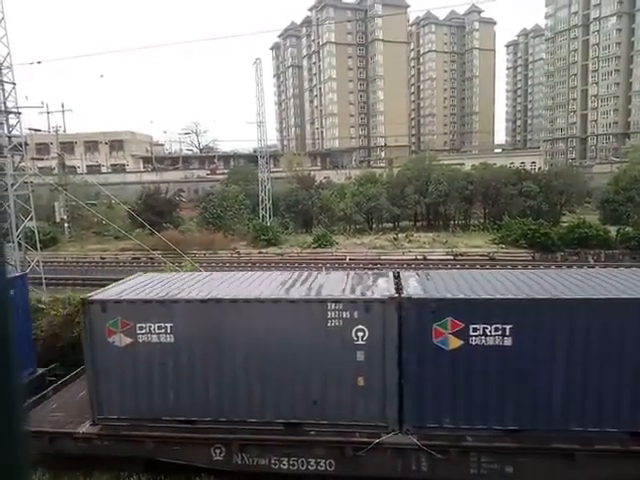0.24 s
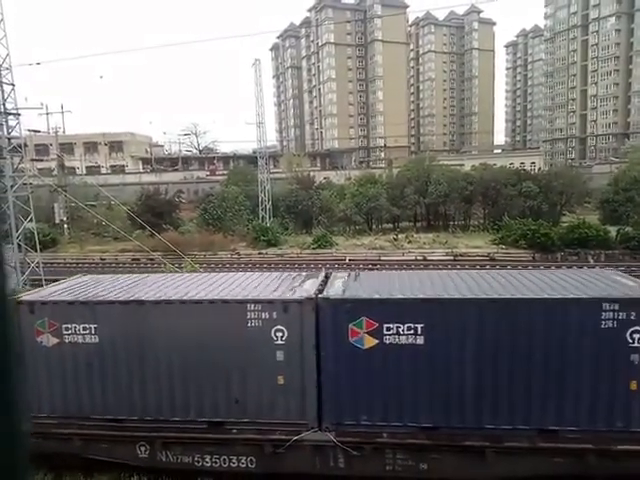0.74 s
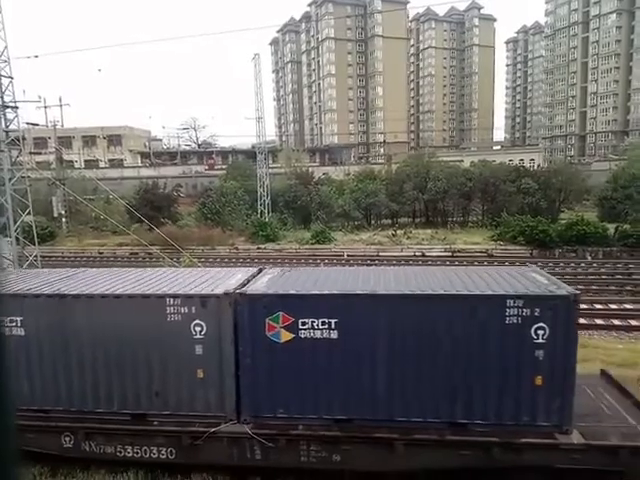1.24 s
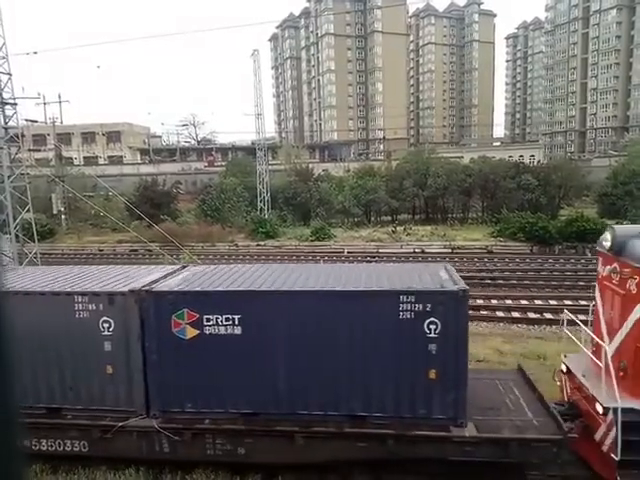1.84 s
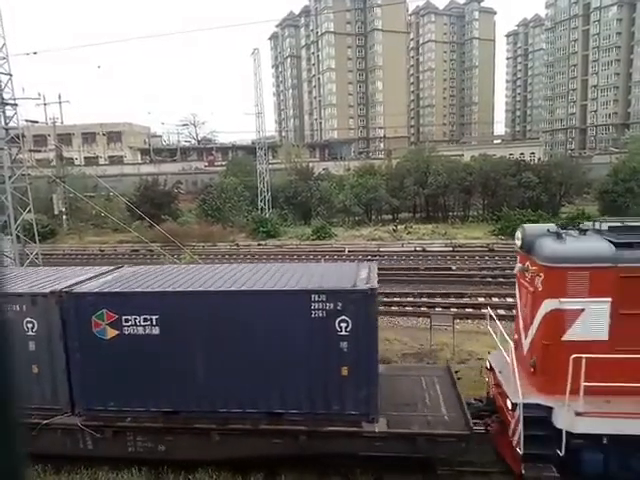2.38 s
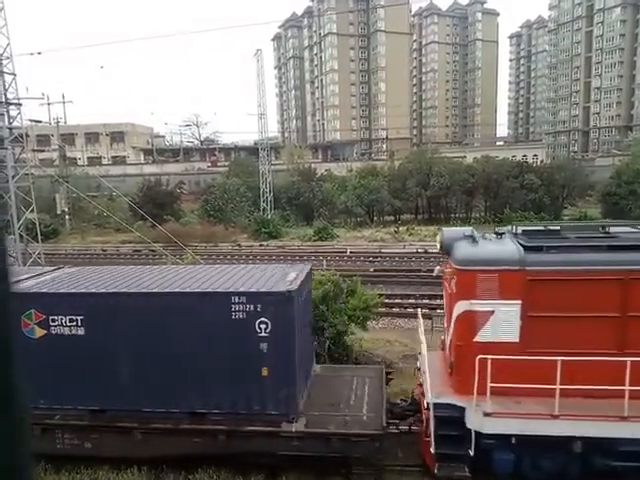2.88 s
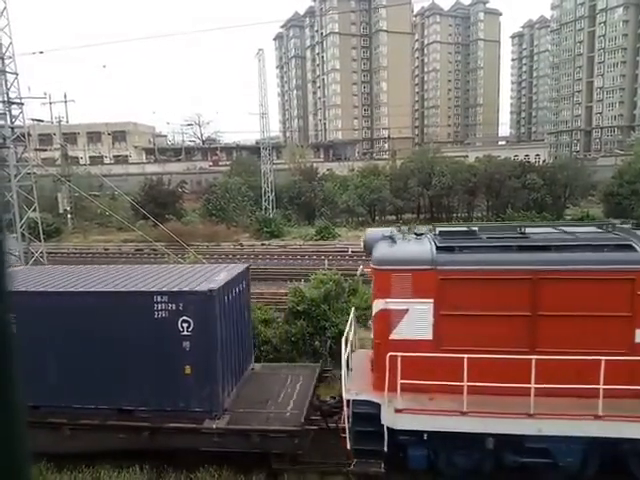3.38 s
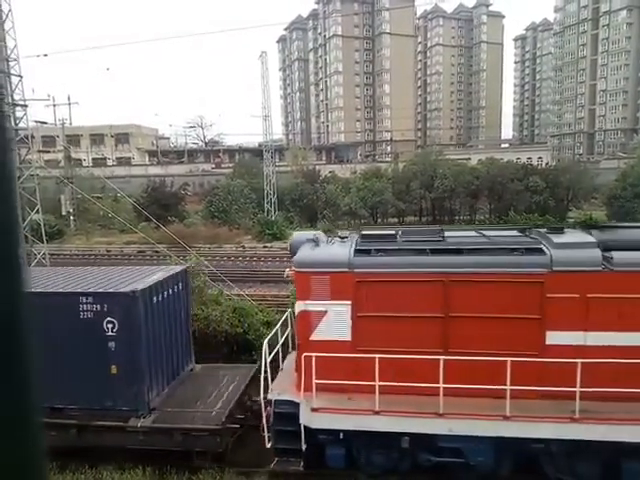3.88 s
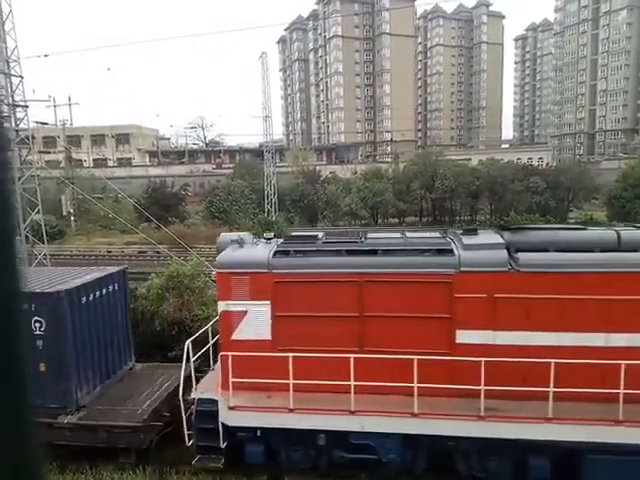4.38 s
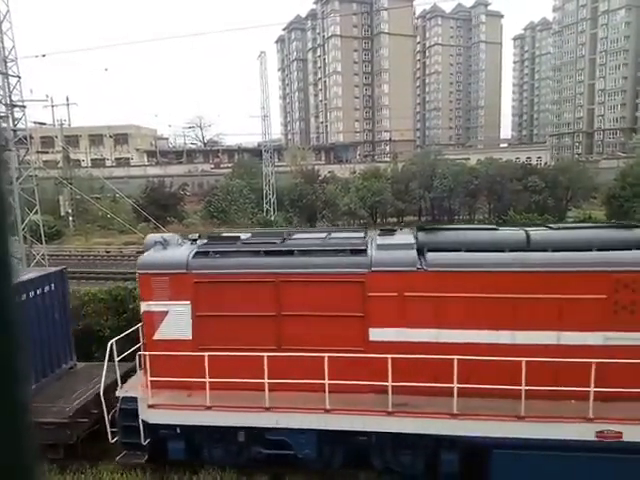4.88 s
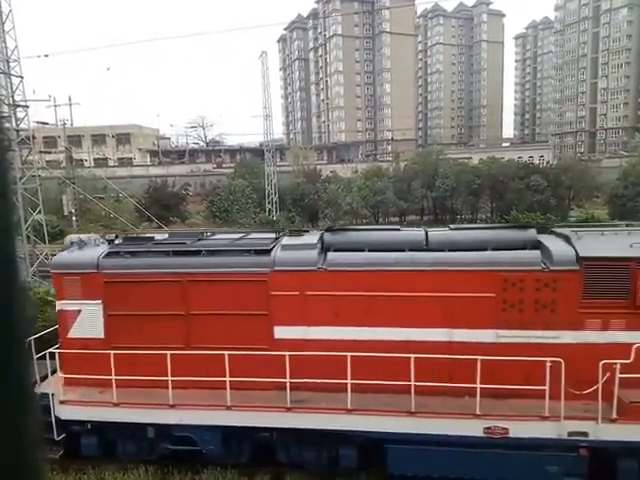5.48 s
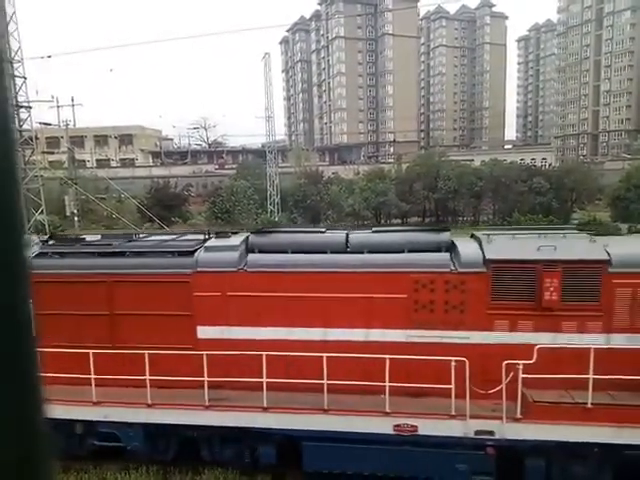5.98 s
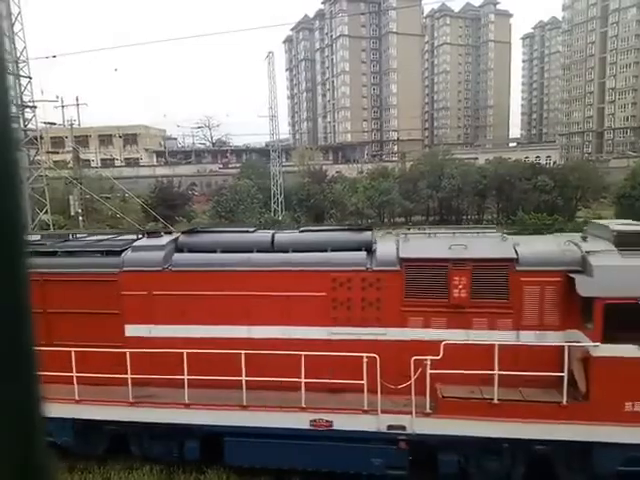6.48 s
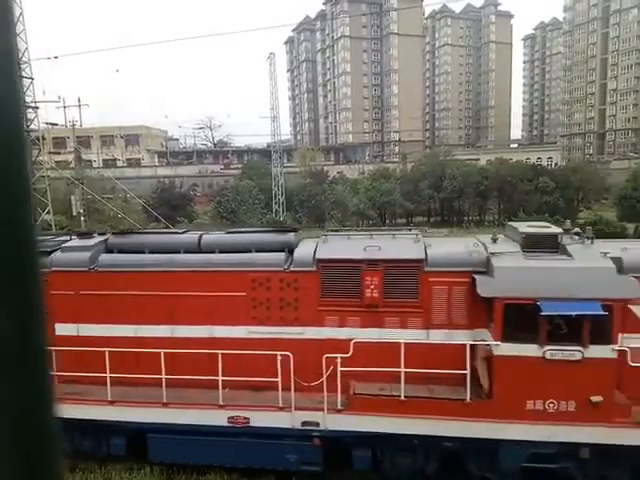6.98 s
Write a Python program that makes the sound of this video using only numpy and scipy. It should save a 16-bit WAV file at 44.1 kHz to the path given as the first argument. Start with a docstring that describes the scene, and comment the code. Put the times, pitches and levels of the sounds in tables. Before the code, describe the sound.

Container wagons roll slowly through a railway yard, their wheels rumbling with faint gritty chinks. A diesel locomotive approaches from the left, its exhaust droning in a loping rhythm over clattering machinery, a humming fan and a thin turbocharger squeal. Couplings scrape twice, a gear whine flares briefly, and the engine grows fuller as it draws level. The right microphone is muffled, so the treble stays left.

```python
"""A diesel locomotive idles slowly past in a railway yard, behind a string of container wagons.
It nears from the left over rumbling wheels: the exhaust drones on orders of the engine cycle,
the machinery throbs, the turbocharger squeals thinly. At 2.5 and 3 s couplings scrape.
Near 5 s a gear whine flares; near 6 s the engine draws level and its firing tone peaks.
The turbocharger's overtones grow toward the end. The right microphone is muffled: treble stays left."""
import sys
import numpy as np
from scipy import signal
from scipy.fft import rfft, irfft
from scipy.io import wavfile

SR = 44100
rng = np.random.default_rng(int(sys.argv[2]) if len(sys.argv) > 2 else 0)


def materialize(psi):
    """Save the field psi as 16-bit PCM at rate SR to the path in sys.argv[1].

    A 1-D psi becomes a single channel; in a 2-D psi each row is a channel.
    """
    bounded = np.clip(np.atleast_2d(psi).T, -1, 1)
    quanta = np.round(bounded * 32767).astype(np.int16)
    wavfile.write(sys.argv[1], SR, quanta)


N = 319284
TIME = np.arange(N) / SR
FREQ = np.fft.rfftfreq(N, 1 / SR)


def undb(db):
    """dB to gain."""
    return 10 ** (np.asarray(db) / 20)


def curve(table):
    """(t/s, value) points, linearly interpolated."""
    return np.interp(TIME, *np.transpose(table))


def unit(x):
    """Scale to rms 1."""
    return x / np.sqrt(np.mean(np.abs(x) ** 2))


def colour(x, spectrum):
    """Filter by (f/Hz, level/dB) points."""
    hz, db = np.transpose(spectrum)
    return irfft(rfft(x) * undb(np.interp(np.log(FREQ + 1), np.log(hz), db)), N)


def drift(rate_hz):
    """Smooth complex random motion, rms 1."""
    t = np.arange(0, 8, 1 / 500)
    f = np.fft.fftfreq(len(t), t[1])
    noise = rng.standard_normal((len(f), 2)) @ [1, 1j]
    return np.interp(TIME, t, unit(np.fft.ifft(noise / (1 + (f / rate_hz) ** 2))))


def diffuse(alike_hz=1300):
    """Noise at two close microphones: bass alike, treble unrelated."""
    mid, side = rfft(rng.standard_normal((2, N)))
    alike = 1 / (1 + (FREQ / alike_hz) ** 2) ** 2
    return irfft(mid * np.sqrt(1 + alike) + side * np.sqrt(1 - alike) * np.array([[1], [-1]]), N)


def tone(hz, scatter, rate_hz, doppler_hz=0):
    """Stereo tone, rms 1: direct path plus shifting reflections, offset by doppler_hz."""
    carrier = np.exp(2j * np.pi * np.cumsum(hz) / SR) * np.sqrt(2 / (1 + scatter ** 2))
    slip = np.exp(2j * np.pi * doppler_hz * TIME)
    return np.array([(carrier * (1 + scatter * slip * drift(rate_hz))).real for _ in range(2)])


def swell(at_s, db, width_s):
    """Bell-shaped gain."""
    return undb(db) * np.exp(-((TIME - at_s) / width_s) ** 2)


def throb(cycles, swing_db, peak_phase):
    """Gain that swells once a cycle."""
    return undb(swing_db * np.cos(2 * np.pi * (cycles - peak_phase)))


def offset(cycles, phase):
    """Signed distance from a phase, in cycles."""
    return (cycles - phase + .5) % 1 - .5


# Four-stroke cycle rate: t/s, f/Hz
CYCLE_HZ = [(0, 5.299), (3, 5.303), (7.24, 5.287)]


def engine_cycles():
    """Running count of engine cycles."""
    return np.cumsum(curve(CYCLE_HZ)) / SR


def repeating(cycles, change_hz):
    """Noise that recurs each engine cycle, its pattern slowly changing."""
    size = int(SR / CYCLE_HZ[0][1])
    patterns = rng.standard_normal((3, size, 2)) @ [1, 1j]
    index = (cycles % 1 * size).astype(int)
    return unit(sum((pattern[index] * drift(change_hz)).real for pattern in patterns))


# Pass-by per part ("fourth": turbo harmonic): closest t/s, half width/s, relative level/dB far, near
PASS_BY = { "firing": (6, 2.5, -32, -20), "gear": (5, 1.2, -41.5, -38), "machinery": (6, 2.3, -32.5, -30.5),
           "air": (9, 1.8, -44.5, -34), "intake": (6.5, 1.5, -35.5, -32.5),
           "fourth": (7.5, 2.34, -45.5, -32.5), }


def passing_db(part):
    """A part swells as it draws level."""
    closest_s, half_s, far_db, near_db = PASS_BY[part]
    return far_db + (near_db - far_db) / (1 + ((TIME - closest_s) / half_s) ** 2)


# Rolling noise: f/Hz, relative level/dB
RUMBLE_SPECTRUM = [(10, -13), (30, -10.5), (80, -5.5), (130, -4), (220, -2), (320, -4.5), (430, -9.5),
                   (580, -24.5), (1000, -34.5), (3000, -82.5)]


def wheels(db=-18.5, fade_db_per_s=0.1, waver_db=2.5):
    """Rough wheels and rails rumble through the frames of the departing wagons."""
    rumble = unit(colour(diffuse(), RUMBLE_SPECTRUM))
    return rumble * undb(db - fade_db_per_s * TIME + waver_db * drift(29).real)


def grit(db=-39, scatter_db=3, decay_s=0.043, low_hz=2000, high_hz=6600, count=110):
    """Grains crushed between wheel and rail chink at random times and pitches."""
    out, t = np.zeros((2, N + SR // 10)), TIME[:SR // 10]
    envelope = (1 - np.exp(-10 * t / decay_s)) * np.exp(-t / decay_s)
    for when, size, pitch, phase in rng.random((count, 4)):
        hz = low_hz + (high_hz - low_hz) * pitch
        chink = np.cos(2 * np.pi * (hz * t + np.array([[0], [phase]])))
        gain = undb(db - scatter_db * np.log(1 - .95 * size))
        out[:, int(when * N):][:, :len(t)] += chink * envelope * gain
    return out[:, :N]


# Coupling resonances: f/Hz, width/Hz, relative level/dB
STEEL_MODES = [(1200, 30, 1.5), (1730, 78, -11), (2000, 45, -3), (2560, 50, -1.5), (2820, 80, -3.5)]
# Sliding steel: f/Hz, relative level/dB
SCRAPE_SPECTRUM = [(600, -12), (1200, 1), (2400, 3.5), (3800, 12), (6500, -11), (7300, -30), (9500, -32)]
# Scrapes: t/s, ring level/dB, hiss level/dB, width/s
SCRAPE_EVENTS = [(2.55, -44, -35, 0.012), (2.977, -27, -32.5, 0.039)]


def couplings():
    """Slack shifts and steel slides on steel, hissing and ringing."""
    steel = sum(undb(db) / (1 + 1j * (FREQ - hz) / width_hz) ** 2 for hz, width_hz, db in STEEL_MODES)
    ring = unit(irfft(rfft(diffuse()) * steel, N))
    hiss = unit(colour(diffuse(), SCRAPE_SPECTRUM))
    return sum(ring * swell(at_s, ring_db, width_s) + hiss * swell(at_s, hiss_db, width_s)
               for at_s, ring_db, hiss_db, width_s in SCRAPE_EVENTS)


# Gear flare: t/s, level/dB, width/s
WHINE_FLARE = (5.15, -31, 0.06)


def gear(hz=1146):
    """A gear drive whines faintly and flares once."""
    whine = tone(np.full(N, hz), scatter=1.2, rate_hz=9)
    return whine * (undb(passing_db("gear")) + swell(*WHINE_FLARE))


# Blade tone: t/s, f/Hz
BLADE_HZ = [(0, 238.5), (1.7, 239.9), (4, 242.7), (6, 244), (7.24, 243.5)]
# Blade tone: t/s, level/dB
BLADE_DB = [(0, -39), (1, -24.5), (2.15, -20.5), (2.4, -30.5), (2.95, -18), (3.35, -29), (3.7, -19.5),
            (4.3, -27.5), (5.25, -32), (5.8, -21), (7.24, -34.5)]


def fan():
    """The cooling fan hums, swelling and fading unevenly."""
    return tone(curve(BLADE_HZ), scatter=.2, rate_hz=8.2)[0] * undb(curve(BLADE_DB))


# Blower hiss: f/Hz, relative level/dB
BLOWER_SPECTRUM = [(1500, -8.5), (2600, 1.5), (3050, 1.5), (3550, 1.5), (3800, 7), (4050, -1), (4300, 5.5),
                   (4650, -1.5), (4950, 1.5), (5600, -7.5), (5900, -6), (6150, 7.5), (6450, -10), (6750, 3),
                   (7250, -52.5), (9500, -58.5)]


def air(cycles, hiss_gain_db=11, duct_hz=2350, width_hz=330, sag_hz_per_s=36):
    """Air rushes through the blower and rings the intake duct, whose note sinks in passing."""
    hiss = unit(colour(diffuse(), BLOWER_SPECTRUM)) * undb(passing_db("air") + hiss_gain_db)
    lowpass = signal.butter(2, width_hz / 2, fs=SR, output="sos")
    band = signal.sosfilt(lowpass, rng.standard_normal((2, N)))
    carrier = np.cos(2 * np.pi * np.cumsum(duct_hz - sag_hz_per_s * TIME) / SR)
    duct = unit(band * carrier) * undb(passing_db("intake"))
    surge = throb(cycles, swing_db=1.3, peak_phase=.45) * undb(1.3 * drift(18).real)
    return (hiss + duct) * surge


# Clatter: f/Hz, relative level/dB
CLATTER_SPECTRUM = [(300, -13), (560, -4), (720, 2), (840, 1.5), (940, 4), (1060, -2.5), (1230, -5),
                    (1330, -2.5), (1450, -8), (1900, -7), (2700, -11.5), (4000, -70)]


def machinery(cycles, gain_db=4, repeat=0.38):
    """Valve gear and pumps clatter behind the hood doors, swelling each cycle and each crank turn."""
    clatter = unit(diffuse()) + repeat * repeating(cycles, change_hz=0.46)
    cycle_beat = throb(cycles, swing_db=0.5, peak_phase=0.61)
    crank_beat = throb(2 * cycles, swing_db=0.78, peak_phase=0.87)
    level_db = passing_db("machinery") + gain_db + 1.7 * drift(8.2).real
    return unit(colour(clatter, CLATTER_SPECTRUM)) * cycle_beat * crank_beat * undb(level_db)


def flutter(cycles, depth_db=-8, phase=0.49, width_turns=0.092):
    """Exhaust pulses dip the squeal unevenly once a crank turn, deepest while far off."""
    dip = np.exp(-(offset(2 * cycles, phase) / width_turns) ** 2)
    far = np.interp(TIME, [2.8, 3.7], [1, .6])
    return undb(depth_db * far * np.abs(drift(5)) * dip)


# Squeal (harmonic 2): t/s, f/Hz
SQUEAL_HZ = [(0, 3336), (2.5, 3361), (4, 3374), (5.4, 3372), (7.24, 3364)]
# Squeal: t/s, relative level/dB
SQUEAL_DB = [(0, -36), (.5, -35.5), (.9, -33), (3.1, -35), (3.9, -29.5), (4.32, -30.5), (4.38, -37),
             (5.2, -36.5), (5.38, -30), (5.7, -35.5), (6.4, -36), (6.55, -31), (6.95, -39.5), (7.12, -29)]
# Squeal dropouts: t/s, width/s
SQUEAL_FALTERS = [(0.725, 0.0089), (1.838, 0.017), (2.39, 0.014), (2.853, 0.022), (3.257, 0.024),
                  (4.576, 0.021), (5.128, 0.014), (5.723, 0.011), (6.098, 0.027), (6.443, 0.04)]
# Harmonic 3: t/s, relative level/dB
THIRD_DB = [(0, -46.5), (4.3, -42.5), (4.55, -37.5), (5.15, -43), (5.8, -35), (6.03, -38), (6.12, -30.5),
            (6.3, -38), (6.55, -32), (6.9, -30.5), (7.24, -31.5)]


def turbo(cycles, squeal_gain_db=7, overtone_gain_db=2, falter_db=-15, rasp=0.38):
    """The turbocharger sings on harmonics 2-5; its rasping overtones firm up as the hood screens less."""
    base_hz = curve(SQUEAL_HZ) / 2 * (1 + 0.00063 * drift(7.8).real)
    reflected = np.interp(TIME, [2.8, 3.7], [0.65, 0.42])  # more reflections while far off
    falters = sum(swell(at_s, 0, width_s) for at_s, width_s in SQUEAL_FALTERS)
    squeal = tone(2 * base_hz, reflected, rate_hz=30, doppler_hz=-7)
    squeal *= undb(curve(SQUEAL_DB) + falter_db * falters + squeal_gain_db)
    screened = np.interp(TIME, [3, 6, 6.6], [2.5, 1.3, .5])
    harmonics_db = {3: curve(THIRD_DB), 4: passing_db("fourth"), 5: passing_db("fourth") - 24}
    overtones = sum(undb(db + overtone_gain_db) * tone(k * base_hz, screened, rate_hz=30, doppler_hz=-6)
                    for k, db in harmonics_db.items())
    return squeal * flutter(cycles) + overtones * (1 + rasp * drift(140).real)


# Exhaust surges: phase/cycles, rise/dB
CHUG_SURGES = [(.15, 4.5), (.91, 3.5)]


def chug(cycles, width_cycles=0.088):
    """The exhaust surges twice a cycle in a limping rhythm; gain of rms 1."""
    rise_db = sum(db * np.exp(-(offset(cycles, phase) / width_cycles) ** 2) for phase, db in CHUG_SURGES)
    return unit(undb(rise_db))


# Knock: f/Hz, relative level/dB
KNOCK_SPECTRUM = [(55, -27.5), (80, -4), (110, 1.5), (190, 12.5), (235, 5.5), (310, 4.5), (400, -4.5),
                  (500, -13), (900, -61)]


def knock(cycles, db=-26):
    """Combustion knocks in a rough pattern that repeats with the cycle."""
    pattern = repeating(cycles, change_hz=0.28)
    return undb(db) * unit(colour(pattern, KNOCK_SPECTRUM)) * chug(cycles)


# Hardest firings: phase/cycles, peak level/dB
HARD_FIRINGS = [(0.147, -11.5), (0.611, -25), (0.895, -13)]


def thumps(cycles, width_s=0.0026, uneven_db=2):
    """The hardest firings stand out as short pressure swings, making the drone lope."""
    out = 0
    for phase, db in HARD_FIRINGS:
        u = offset(cycles, phase) / CYCLE_HZ[0][1] / width_s
        out += undb(db) * (2 * u ** 2 - 1) * np.exp(-u ** 2)
    return out * undb(uneven_db * drift(5.3).real)


def notch_at_drone(x, width_hz=5.3):
    """Notch at order 24, so the drone stands clean."""
    notch = 1 - np.exp(-((FREQ - 24 * CYCLE_HZ[0][1]) / width_hz) ** 4)
    return irfft(rfft(x) * notch, N)


def order(cycles, k):
    """Sine at k times the cycle rate: rms 1, random phase."""
    return np.sqrt(2) * np.cos(2 * np.pi * (k * cycles + rng.random()))


def boom(cycles, db=-26.5, echo_db=-7.5, in_step_s=3.3, period_s=5.1):
    """Exhaust order 9 and its echo off the wagons drift in and out of step."""
    echo = undb(echo_db) * np.exp(2j * np.pi * (TIME - in_step_s) / period_s)
    return undb(db) * np.abs(1 + echo) * order(cycles, 9)


# Weak exhaust orders, by order: relative level/dB approaching, alongside
WEAK_ORDERS_DB = {14: (-33, -38), 19: (-29.5, -29), 23: (-32, -30), 26: (-27.5, -28.5), 27: (-25.5, -26),
                  28: (-24, -24.5), 32: (-24, -26), 33: (-27, -31), 35: (-26, -26), 37: (-29.5, -29),
                  49: (-39, -35.5), 59: (-35.5, -39.5)}


def weak_orders(cycles, gain_db=-4, screen_db=-2, waver=0.8, clear_s=1.8, alongside_s=4.4, fade_s=1.2):
    """Unequal cylinders add wavering orders whose balance shifts as the engine comes alongside."""
    alongside = np.clip(.5 + (TIME - alongside_s) / fade_s, 0, 1)
    screened = np.clip(.5 + (clear_s - TIME) / fade_s, 0, 1)
    out = 0
    for k, (far_db, near_db) in WEAK_ORDERS_DB.items():
        level_db = far_db + (near_db - far_db) * alongside
        out += undb(level_db) * order(cycles, k) * (1 + waver * drift(0.38).real)
    return out * undb(gain_db + screen_db * screened)


# Hum (order 21): t/s, level/dB
HUM_DB = [(0, -27), (.45, -22), (.9, -30.5), (2.2, -34), (3.7, -24.5), (4, -23), (5.2, -21.5), (5.8, -33),
          (7.24, -23)]
# Drone (order 24): t/s, level/dB
DRONE_DB = [(0, -22), (.9, -37), (1.4, -25.5), (3.2, -24), (4.2, -19), (4.8, -20.5), (5.1, -25.5),
            (5.5, -19.5), (6.15, -16), (7.24, -24)]
# Drone puff: swing/dB, phase/cycles
DRONE_PUFF = (4.5, .16)


def exhaust(cycles):
    """Twelve cylinders give a firing tone, a puffing drone an octave up and chugging lesser orders."""
    firing = undb(passing_db("firing")) * order(cycles, 12)
    drone = undb(curve(DRONE_DB)) * order(cycles, 24) * unit(throb(cycles, *DRONE_PUFF))
    hum = undb(curve(HUM_DB)) * order(cycles, 21)
    return firing + drone + (hum + weak_orders(cycles)) * chug(cycles)


# Right microphone delay, source moving left to centre: t/s, lag/s
RIGHT_LAG_S = [(0, .00034), (2.5, .00032), (3.5, .00018), (6, 0), (7.24, -.00007)]


def placed(stereo):
    """Sound from the left reaches the right microphone later."""
    left, right = stereo
    return np.array([left, np.interp(TIME - curve(RIGHT_LAG_S), TIME, right)])


def scene():
    """One crankshaft times the engine's rhythms; the wheels roll on their own."""
    cycles = engine_cycles()
    engine = boom(cycles) + exhaust(cycles) + notch_at_drone(thumps(cycles) + knock(cycles))
    accessories = machinery(cycles) + air(cycles) + turbo(cycles) + fan() + gear()
    return placed(engine + accessories + wheels() + couplings() + grit())


# Muffled right microphone: f/Hz, level/dB
RIGHT_RESPONSE = [(100, 0), (320, -1), (550, -2), (970, -4.5), (1680, -10.5), (2300, -15), (3000, -19),
                  (5100, -21.5), (9000, -38)]


def record(dry, ceiling=.9, top_hz=9500):
    """Muffled right microphone, soft peak limit, low-pass."""
    stereo = np.array([dry[0], colour(dry[1], RIGHT_RESPONSE)])
    rounded = stereo / (1 + (stereo / ceiling) ** 8) ** (1 / 8)
    return signal.sosfilt(signal.ellip(8, .2, 70, top_hz, fs=SR, output="sos"), rounded)


dry = scene()
out = record(dry)
materialize(out)
```